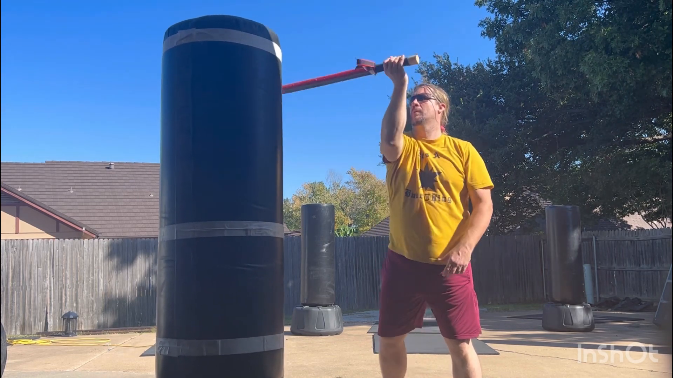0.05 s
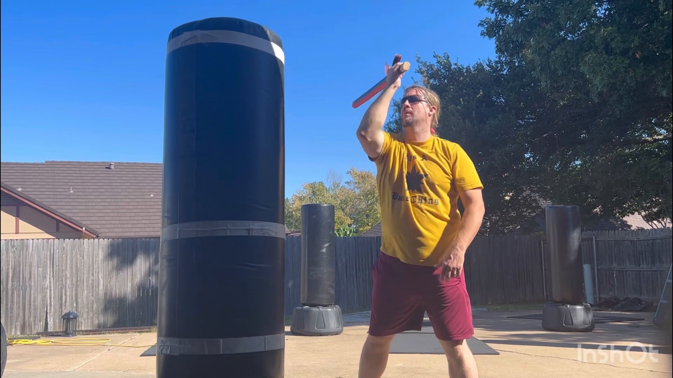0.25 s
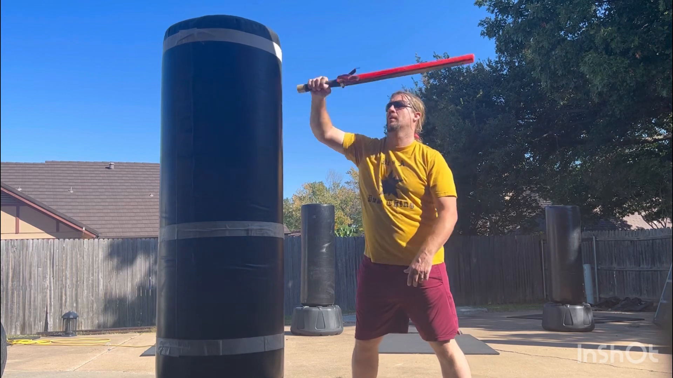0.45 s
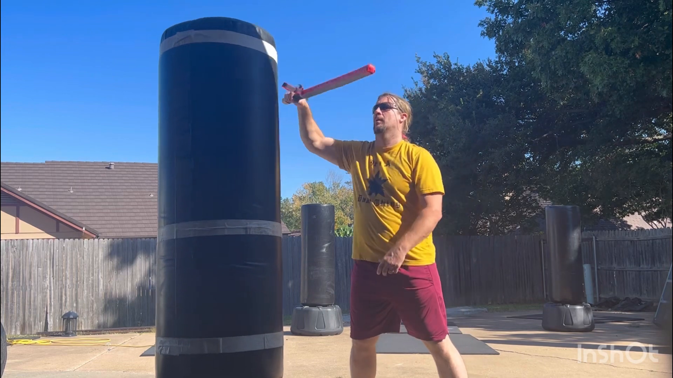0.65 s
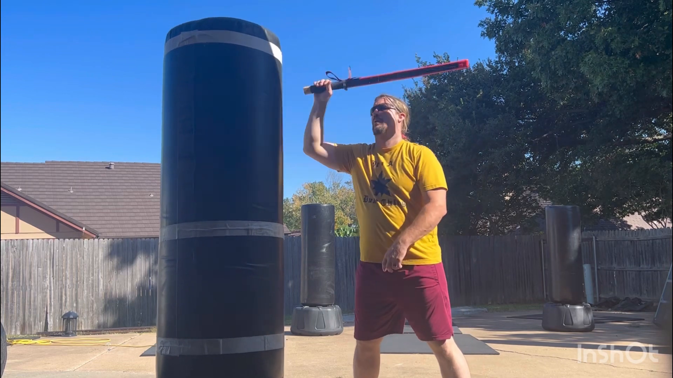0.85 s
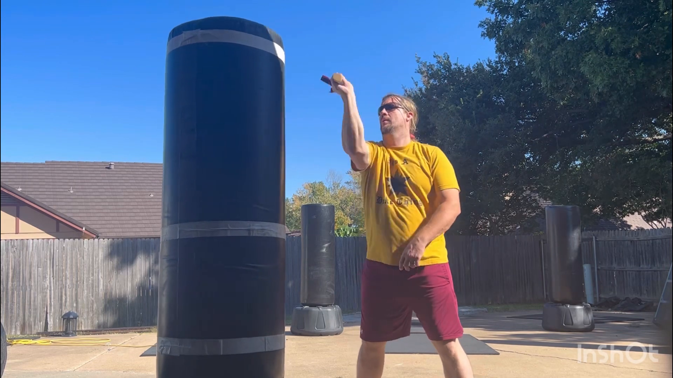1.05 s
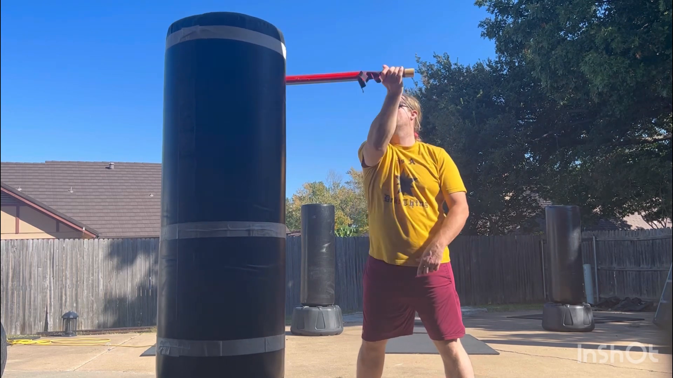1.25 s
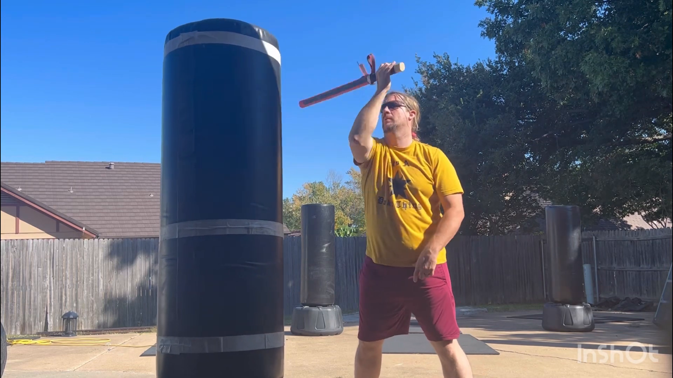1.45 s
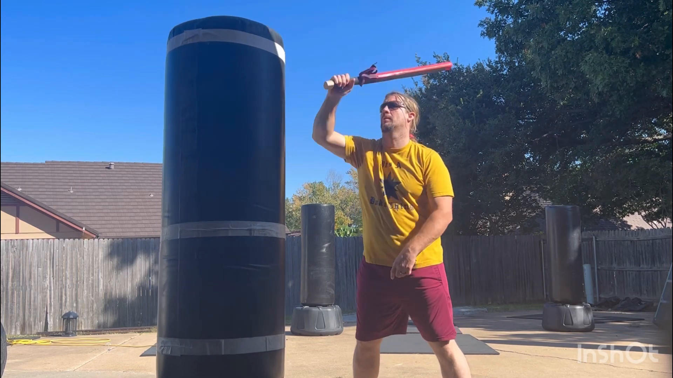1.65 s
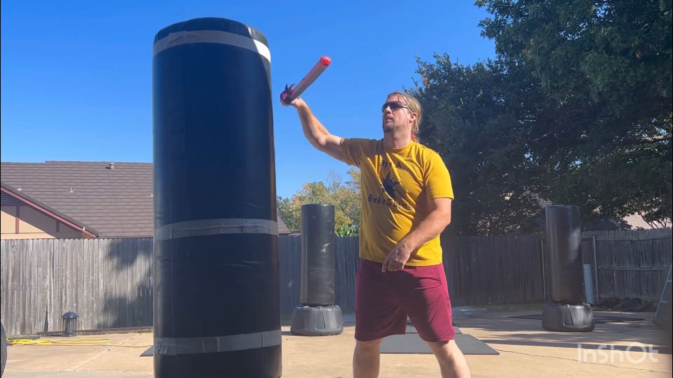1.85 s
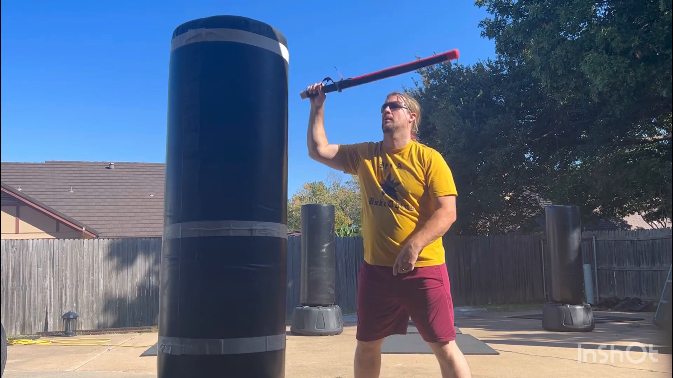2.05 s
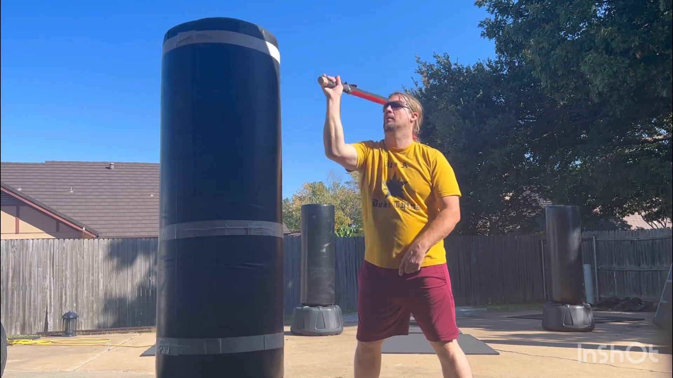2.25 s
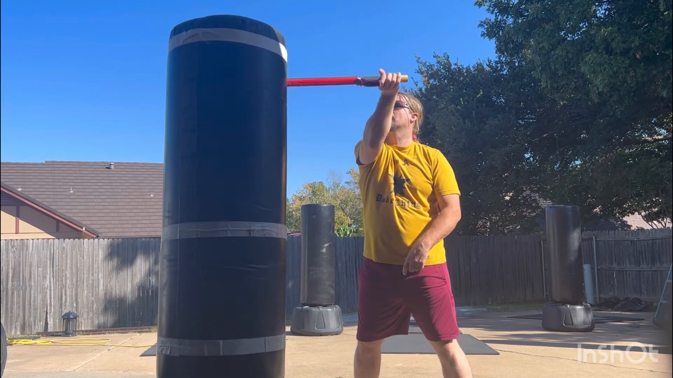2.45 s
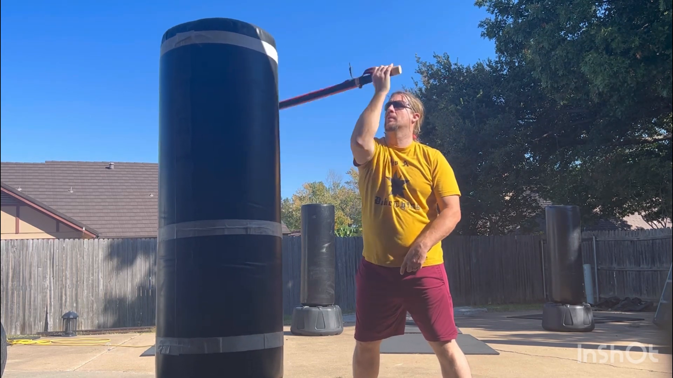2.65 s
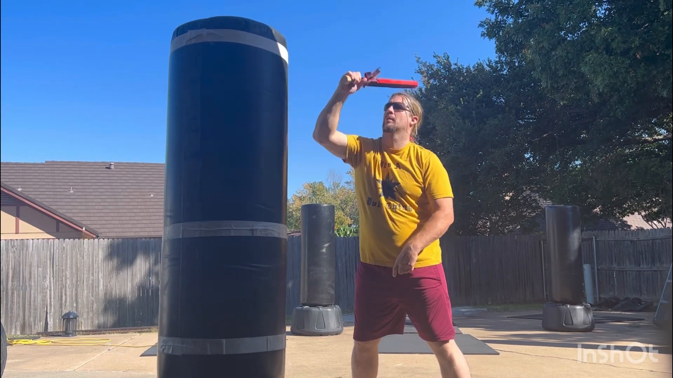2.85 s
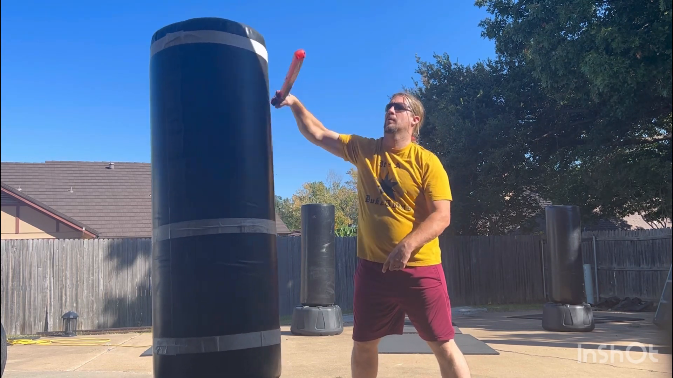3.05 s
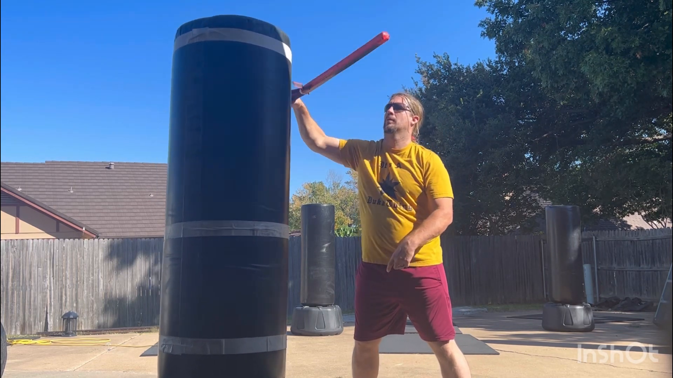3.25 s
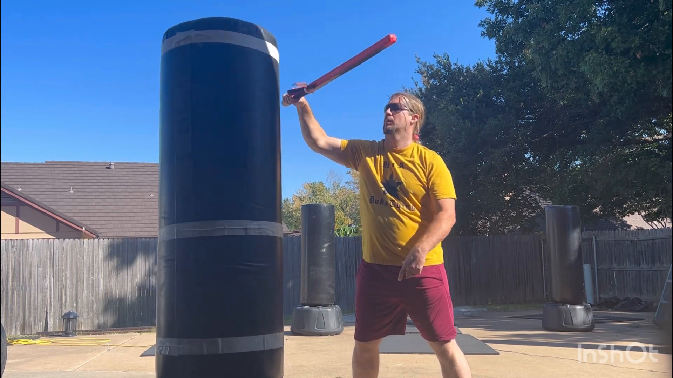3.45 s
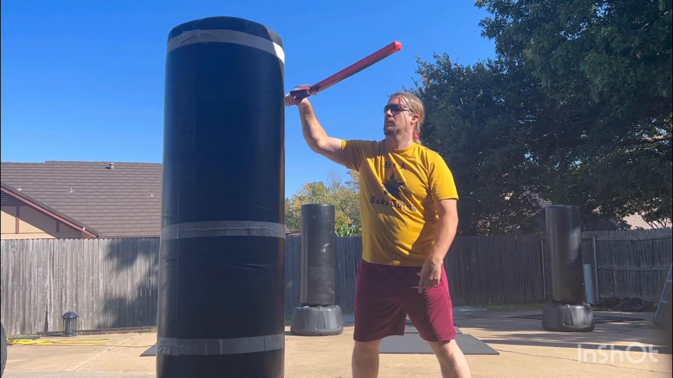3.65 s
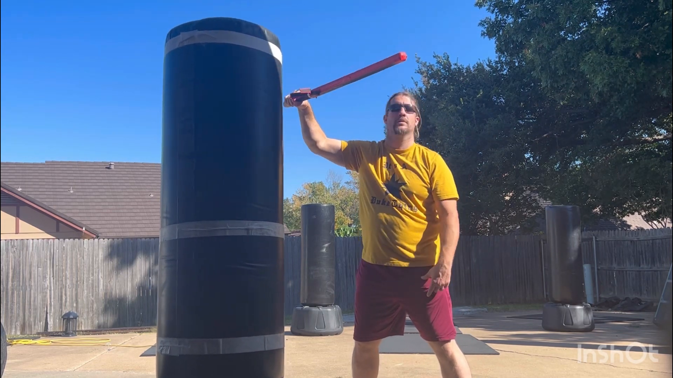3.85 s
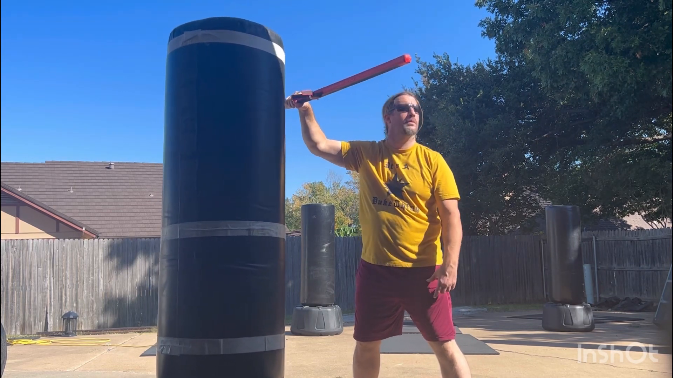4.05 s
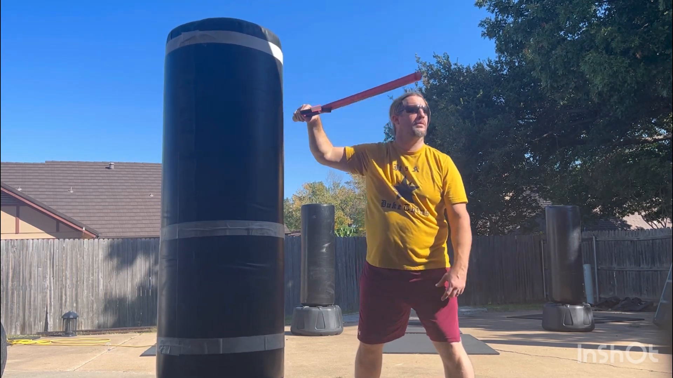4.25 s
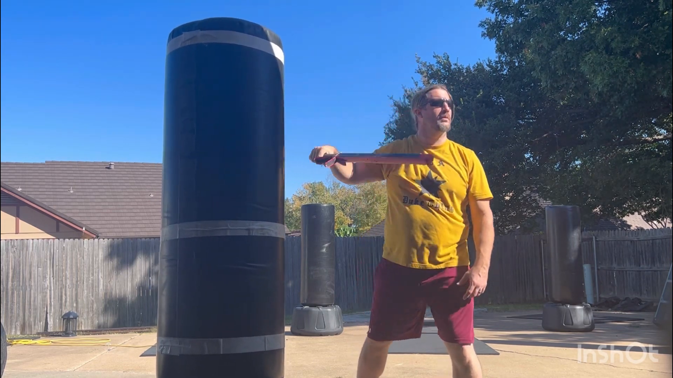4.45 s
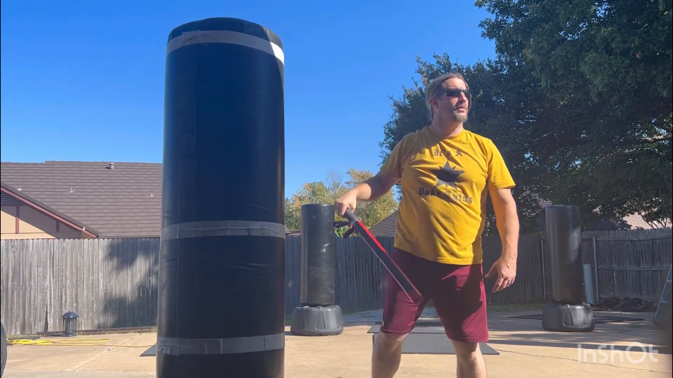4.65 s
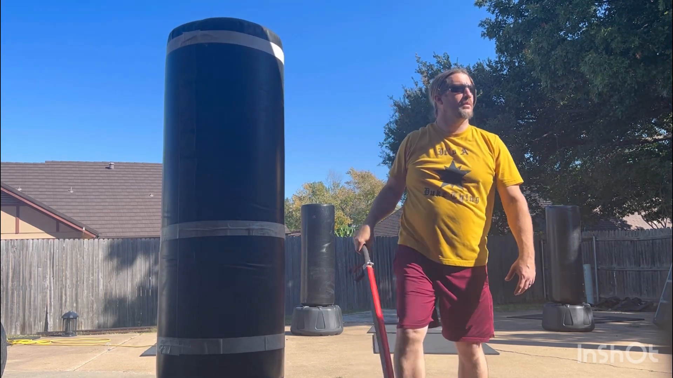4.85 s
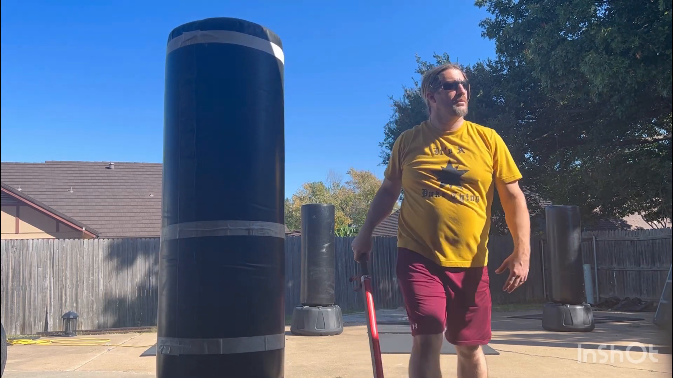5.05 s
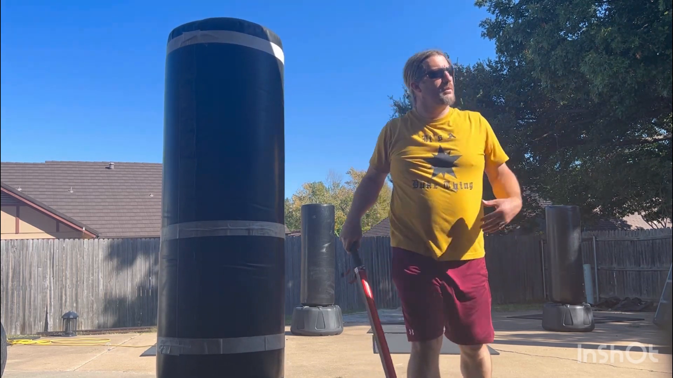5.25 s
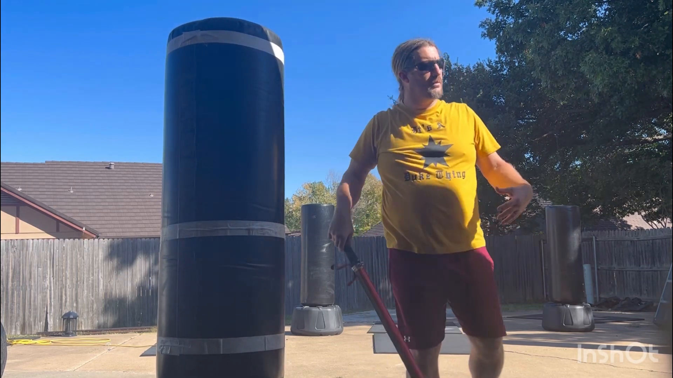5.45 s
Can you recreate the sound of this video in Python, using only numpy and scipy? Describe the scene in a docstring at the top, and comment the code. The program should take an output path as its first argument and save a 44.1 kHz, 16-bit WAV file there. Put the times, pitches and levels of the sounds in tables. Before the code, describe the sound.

The sound begins inside the decay of a blow struck just before the start. A padded practice sword then hits a tall inflated bag at about 0.5, 1.2, 1.8, 2.4 and 3.0 seconds. Each hit is a loud slap whose pitch plunges instantly into a hollow, drum-like boom, with a short dull ring, a quick bounce off paving and a rapidly fading yard tail. The 1.2 blow has more stick knock and crisp grip clicks just after; the 2.4 blow is softer and duller, the 3.0 one very sharp. Between them the bag rocks back with low thuds and grainy plastic creaks, most clearly near 3.3. After 3.8 it is nearly quiet: low distant rumble, barely audible shoe scuffs, a small tick at 5.2, very faint quavering bird whistles and a thin insect buzz. Close stereo, slightly overloaded on peaks.

```python
"""A padded practice sword strikes a tall air-filled punching bag in a fenced yard. Each blow is a slap of
noise, a falling whoop of the taut skin and the summed ring tones of bag and sword; a bounce off the paving and
a fading noise tail from the yard answer it. The bag rocks on its base with thuds, creaks and sharp knocks, the
sword's grip ticks, shoes scuff, a far bird whistles, and a thin insect buzz lies over a low outdoor rumble."""
import sys
import numpy as np
from scipy import signal
from scipy.fft import rfft, irfft
from scipy.io import wavfile
from scipy.ndimage import uniform_filter1d

SR = 44100
rng = np.random.default_rng(int(sys.argv[2]) if len(sys.argv) > 2 else 0)


def materialize(psi):
    """Save the field psi as 16-bit PCM at rate SR to the path in sys.argv[1].

    A 1-D psi becomes a single channel; in a 2-D psi each row is a channel.
    """
    bounded = np.clip(np.atleast_2d(psi).T, -1, 1)
    quanta = np.round(bounded * 32767).astype(np.int16)
    wavfile.write(sys.argv[1], SR, quanta)


N = 242988  # length of the scene in samples


def blows():
    """Each stroke makes slap, whoop and rings together; the paving and the yard throw sound back."""
    # strokes of the sword; a negative time starts before the scene does:
    # [t/s, force/dB, contact time/s, glancing 0-1, air ring level/dB, sword ring level/dB]
    strokes = [ (-.125, 0, 0.00078, 0.9, -14.5, -29), (0.5249, -0.5, .0014, 0.22, -9, -32.5),
               (1.1634, -1, .0024, .68, -10.5, -10.5), (1.7708, -1, 0.0013, 0, -14, -25),
               (2.4277, -1, 0.0039, .95, -19, -22), (2.9939, -1, 0.0006, 0.21, -9.5, -28), ]
    out = np.zeros((2, N))
    for s, force_db, contact, glancing, ring_db, core_db in strokes:
        # each doubling of the contact time beyond 1 ms is one step of softness
        soft = np.log2(contact / 0.001)
        skin_db = force_db - 4.5
        # a glancing stroke stirs mostly the low air modes (dB per octave)
        ring_tilt_db = -11.5 * glancing

        # a soft contact gives a weaker slap and a longer whoop
        slap_sound = slap(force_db - 5.5 - 6 * soft, contact)
        skin = amp(skin_db) * whoop(decay=0.015 * 1.06 ** soft, rise=0.67 * contact)
        direct = slap_sound + skin + amp(core_db) * core(ring_tilt_db)
        add(out, s, echoed(direct, lag=0.00229, gain=amp(-4.5)))  # bounce off the paving
        add(out, s, amp(skin_db) * round_trips() + amp(ring_db) * ring(ring_tilt_db))

        # softer strokes get a duller tail, glancing ones a weaker tail; its level is uneven
        tail = yard(tilt_db=-0.55 - 0.22 * soft) * grit(depth_db=0.5)
        tail_db = force_db - 15 - 4.5 * glancing
        add(out, s, amp(tail_db) * tail * burst(0.00095, 1.8))
    return out


def slap(slap_db, contact, snap_db=0, snap_growth=1.1):
    """Sword on vinyl: noise that swells and fades with the contact, plus the cover's sharp snap."""
    # noise colour of the slap: [f/Hz, relative level/dB]
    slap_colour = [(200, -30.5), (600, -12), (900, 10.5), (1150, -5.5), (1500, -3.5), (2400, 7), (4000, -1),
                   (7000, -9.5), (12000, -8.5), (16000, -4.5)]
    # noise colour of the snap: [f/Hz, relative level/dB]
    snap_colour = [(2000, -17), (4500, -2.5), (8000, 4.5), (12000, -4), (16000, 1)]
    rise = 0.18 * contact
    # a slower contact leans very slightly towards the treble
    tilt_db = 0.14 * np.log2(1 + rise / 0.00051)
    body = amp(slap_db) * noise(slap_colour, tilt_db=tilt_db) * burst(rise, contact)
    # the snap grows faster than the slap, so strong slaps are brighter
    snap = amp(snap_db + snap_growth * slap_db) * noise(snap_colour) * burst(rise / 2, 0.0006)
    return body + snap


def whoop(decay, rise, tension=0.98, start_hz=2530, glide=0.0004476, rest_hz=15):
    """Short waves run fastest over the skin, so the pitch dives from treble to bass in a few cycles."""
    t = np.arange(SR) / SR
    # tension scales the whole pitch curve
    hz = tension * (start_hz / (1 + t / glide) + rest_hz)
    first_push = 1 + 0.5 * np.exp(-t / 0.0094)
    # the sword's foam keeps faster waves out of the skin
    padding = 1 / (1 + (hz / 1152) ** 4)
    wave = np.sin(2 * np.pi * np.cumsum(hz) / SR)
    return wave * burst(rise, decay) * first_push * padding


def round_trips(trip=0.016, first_db=-5, loss_db=-5.0, decay=0.0062):
    """The wave front, its bass and treble softened, returns from the bag's ends, weaker each time."""
    band = signal.butter(1, [130, 600], "bandpass", fs=SR, output="sos")
    front = signal.sosfilt(band, whoop(decay, rise=0.0013))
    out = np.zeros((2, SR))
    for k in range(6):
        add(out, (k + 1) * trip, amp(first_db + k * loss_db) * front)
    return out


def ring(tilt_db):
    """The air modes build up as the wave crosses the bag; the kind of stroke tilts their balance."""
    # air inside the bag, before the tilt; t60 is the time to fall by 60 dB: [f/Hz, level/dB, t60/s]
    air_modes = [(66.2, -10, 0.4), (115.8, -2, 0.27), (173.8, 0, 0.34), (253.2, 5.5, 0.22), (320, -3, .17),
                 (366, -22, 0.18), (423, -25, .17), (526, -12, 0.46), (636, -15.5, .25), (764, -12, 0.13),
                 (855, -16.5, 0.3), (995, -18, 0.076), (1150, -24.5, 0.31), (2270, -17, 0.35)]
    t = np.arange(SR) / SR
    out = np.zeros(SR)
    for hz, db, t60 in air_modes:
        level_db = db + tilt_db * np.log2(hz / 110)
        out += amp(level_db - 60 * t / t60) * np.sin(2 * np.pi * hz * t)
    return out * (1 - np.exp(-(t / 0.025) ** 2))


def core(place_db, lean=-1.66):
    """The sword's short ring; a stroke that stirs the bag's low modes stirs the sword's high ones."""
    # the stiff core damped by its padding, before the lean and a random shift in pitch:
    # [f/Hz, level/dB, t60/s]
    core_modes = [(390, -1, 0.043), (660, 0.5, .04), (908, -4, 0.079), (1320, -11.5, 0.036),
                  (1580, -8.5, 0.021), (1980, -20, 0.029), (2310, -32.5, 0.064)]
    t = np.arange(SR) / SR
    out = np.zeros(SR)
    for hz, db, t60 in core_modes:
        level_db = db + lean * place_db * np.log2(max(hz / 900, 1))
        shifted_hz = hz * rng.uniform(0.89, 1.02)
        out += amp(level_db - 60 * t / t60) * np.sin(2 * np.pi * shifted_hz * t)
    return out * (1 - np.exp(-t / 0.0016))


def echoed(x, lag, gain):
    """A sound plus one copy of it, delayed by lag seconds."""
    out = x * np.ones((2, 1))
    add(out, lag, gain * x)
    return out


def yard(tilt_db=0, far_db=-21, linger=3.07):
    """A noise tail that fades sooner in the treble; far roofs and trees add a faint, slower one."""
    # scatter from fence, paving and trees: [f/Hz, relative level/dB]
    scatter_colour = [(25, -13), (60, 0), (130, -3), (280, 2.5), (480, -4.5), (800, -7), (1300, -11),
                      (2400, -15.5), (4000, -20), (8000, -21), (11500, -23.5), (15500, -25.5)]
    # how long the scatter takes to fall by 60 dB: [f/Hz, t60/s]
    scatter_t60 = [(60, 1.52), (250, 0.73), (700, 0.65), (2400, 0.64), (5000, 0.6), (8000, .45),
                   (12000, 0.31), (16000, .3)]
    hz, t, z = signal.stft(noise(scatter_colour, tilt_db=tilt_db), SR, nperseg=512)
    fall_db = -60 * t / read(scatter_t60, hz)[:, None]
    far = amp(far_db + fall_db / linger) / (1 + (hz[:, None] / 5000) ** 2)
    both = np.hypot(amp(fall_db), far)
    return signal.istft(z * both, SR, nperseg=512)[1][:, :SR]


def rocking():
    """The bag swings back: a soft thud in the base and a grainy rub of plastic."""
    # the bag rocks back on its base: [t/s, thud level/dB, creak level/dB]
    rocks = [(0.864, -28.5, -46.5), (1.52, -34.5, -54), (2.121, -31, -39.5), (2.784, -40.5, -52.5),
             (3.305, -24.5, -43), (3.489, -37.5, -49), (3.684, -53, -51.5), (3.728, -36.5, -54),
             (4.27, -42.5, -71)]
    # noise colour of the thud: [f/Hz, relative level/dB]
    thud_colour = [(30, -28), (65, -3), (125, 2), (250, -10.5), (450, -22), (1200, -68.5)]
    # noise colour of the creak: [f/Hz, relative level/dB]
    creak_colour = [(150, -16.5), (450, 4.5), (900, 2.5), (1400, 5.5), (2500, -11.5), (5000, -34),
                    (9000, -39), (15000, -58)]
    out = np.zeros((2, N))
    for s, thud_db, creak_db in rocks:
        thud = noise(thud_colour) * burst(0.0033, 0.053)
        creak = noise(creak_colour) * burst(0.00077, 0.029) * grit(depth_db=-1.5)
        add(out, s, amp(thud_db) * thud)
        add(out, s, amp(creak_db) * creak)
    return out


def sharp_ticks(wet_db=-24):
    """Sharp ticks: very short noise bursts, each with a faint tail; most come from the sword's grip, those at
    3.494 s and 3.71 s from the bag knocking as it rocks on its base."""
    # ticks; the tilt acts above 300 Hz: [t/s, level/dB, tilt/dB per octave]
    ticks = [(.424, -65, 6), (1.0888, -55, 2), (1.1687, -16.5, 0), (1.1745, -22, 1), (1.2252, -24, 1.5),
             (1.2286, -11, -1.5), (2.487, -34.5, 3), (3.494, -43, -3), (3.71, -38.5, -3.5),
             (4.157, -55.5, 2), (5.1079, -52, 0.5), (5.225, -37.5, -1.5)]
    # noise colour of a tick: [f/Hz, relative level/dB]
    tick_colour = [(400, -15.5), (1300, 5), (3000, 1.5), (6000, -4.5), (10000, -4), (16000, -16)]
    out = np.zeros((2, N))
    for s, db, tilt_db in ticks:
        shape = burst(0.0001, 0.0011) + amp(wet_db) * burst(0.004, 0.035)
        add(out, s, amp(db) * noise(tick_colour, tilt_db=tilt_db) * shape)
    return out


def shoe_scuffs():
    """Shoes rub over the paving: gritty noise that swells and fades."""
    # scuffs: [t/s, level/dB, length/s]
    scuffs = [(3.965, -62.5, 0.36), (4.484, -66, 0.11), (4.997, -63.5, 0.092), (5.073, -70.5, 0.45)]
    # noise colour of a scuff: [f/Hz, relative level/dB]
    scuff_colour = [(300, -3.5), (1500, 1), (4000, -5.5), (8000, -9), (11000, -17), (16000, -24)]
    out = np.zeros((2, N))
    for s, db, length in scuffs:
        size = int(length * SR)
        rub = (noise(scuff_colour) * grit(depth_db=4.5))[:, :size]
        add(out, s, amp(db) * rub * np.hanning(size))
    return out


def bird(level_db=-2):
    """Each far call is a clear high note, overlapped by a more slurred one about a third lower."""
    # calls, levels before level_db: [t/s, pitch of first note f/Hz, first level/dB, second level/dB]
    calls = [(0.406, 3200, -66, -74), (1.541, 3130, -68, -68), (2.2, 3300, -61.5, -61.5),
             (2.839, 3410, -64, -60), (3.85, 3170, -63, -68), (4.11, 2830, -62, -70),
             (4.217, 3330, -67, -69.5), (4.459, 3120, -60, -76), (4.672, 3090, -59.5, -69),
             (4.975, 3480, -58.5, -67)]
    out = np.zeros((2, N))
    for s, hz, first_db, second_db in calls:
        add(out, s, amp(first_db) * whistle(hz, quaver=0.022))
        add(out, s + 0.05, amp(second_db) * whistle(hz * 0.8, quaver=0.059))
    return amp(level_db) * out


def whistle(start_hz, quaver, blur=0.057):
    """One sinking, quavering note, blurred by the trees: mixed with a smear through fading noise."""
    size = int(0.091 * SR)  # note length in s
    waver = evened(uniform_filter1d(rng.standard_normal(SR), size=110))[:size]
    sag = np.linspace(1, 1 - 0.027, size)  # sinks by this share of its pitch
    hz = start_hz * sag * (1 + quaver * waver)
    note = np.sin(2 * np.pi * np.cumsum(hz) / SR) * signal.windows.tukey(size, 0.5)
    smear = rng.standard_normal((2, SR)) * burst(0.00084, blur)
    far = signal.fftconvolve(note[None], smear, axes=1)
    far *= np.linalg.norm(note) / np.linalg.norm(far[0])
    add(far, 0, 0.49 * note)
    return far


def insects():
    """A thin far buzz: a steady narrow band of noise."""
    # noise colour of the buzz: [f/Hz, relative level/dB]
    buzz_colour = [(4500, -34), (4900, -4.5), (5000, -4), (5100, -4), (5500, -35.5)]
    return amp(-82) * noise(buzz_colour, size=N)


def rumble():
    """Distant traffic and air: low noise whose level wavers very slightly."""
    # noise colour of the rumble: [f/Hz, relative level/dB]
    rumble_colour = [(25, -39), (38, -7.5), (55, -5), (120, -2.5), (160, -11.5), (200, -8), (280, -16.5),
                     (400, -22), (1000, -31.5), (1700, -44), (3000, -44.5), (5200, -51), (8000, -56.5),
                     (11000, -65), (16000, -71)]
    t = np.arange(N) / SR
    waver = np.zeros(N)
    for hz in np.geomspace(0.5, 8, 20):
        waver += np.sin(2 * np.pi * (hz * t + rng.random()))
    level_db = -44.5 + 0.15 * evened(waver)
    return noise(rumble_colour, size=N) * amp(level_db)


def noise(spectrum, size=SR, tilt_db=0):
    """Coloured stereo noise of rms 1 before the tilt, most alike in both ears in the bass."""
    # how alike left and right are (1 = identical): [f/Hz, likeness 0-1]
    likeness = [(80, 0.99), (250, 0.81), (500, 0.09), (1000, 0), (3000, 0.47), (8000, 0.32), (15000, 0)]
    hz = np.fft.rfftfreq(size, 1 / SR)
    a, b = rfft(rng.standard_normal((2, size)))
    same = np.clip(read(likeness, hz), -1, 1)
    mid, side = a * np.sqrt(1 + same), b * np.sqrt(1 - same)
    colour = evened(amp(read(spectrum, hz)))
    colour = colour * amp(tilt_db * np.log2(np.maximum(hz / 300, 1)))  # dB per octave above 300 Hz
    return irfft(np.array([mid + side, mid - side]) * colour / np.sqrt(2), size)


def burst(rise, decay):
    """One second of envelope: a quick swell, then an exponential fall (time constants in s)."""
    t = np.arange(SR) / SR
    return (1 - np.exp(-t / rise)) * np.exp(-t / decay)


def grit(depth_db, size=SR):
    """An uneven level of rms 1 that changes every few milliseconds."""
    wander = evened(uniform_filter1d(rng.standard_normal(size), size=130))
    return evened(amp(depth_db * wander))


def amp(db):
    """Decibels to gain."""
    return 10 ** (np.asarray(db) / 20)


def evened(x):
    """Scales to rms 1."""
    return x / np.sqrt(np.mean(x ** 2) + 1e-20)


def read(points, hz):
    """Reads a table on a log-frequency axis."""
    f, value = np.transpose(points)
    return np.interp(np.log(hz + 1), np.log(f + 1), value)


def add(mix, s, sound):
    """Mixes a sound in from time s on, cutting off what falls outside the mix."""
    start = round(s * SR)
    sound = sound[..., max(-start, 0):]
    part = mix[:, max(start, 0):][:, :sound.shape[-1]]
    part += sound[..., :part.shape[-1]]


def scene():
    """Everything that reaches the microphones."""
    return blows() + rocking() + sharp_ticks() + shoe_scuffs() + bird() + insects() + rumble()


def record(dry, low_cut_hz=36, edge_hz=16400, ceiling=1.0):
    """Microphone colour and low cut, a soft overload of the loudest peaks, then the band limit."""
    # dips in the microphones' treble: [f/Hz, width/Hz, depth/dB]
    notches = [(9664, 560, -25), (13300, 590, -19.5)]
    # stereo balance of the microphones: [f/Hz, left minus right level/dB]
    balance = [(60, -0.6), (250, -2), (700, 0), (2000, 0), (4500, 5.5), (8000, -0.5)]
    size = 2 ** 18
    hz = abs(np.fft.fftfreq(size, 1 / SR))
    colour_db = sum(db * np.exp(-((hz - f) / width) ** 2) for f, width, db in notches)
    # give the dips the phase of a filter that only acts after the sound arrives
    causal = np.exp(np.conj(signal.hilbert(np.log(amp(colour_db)))))
    sides = amp(np.outer([0.5, -0.5], read(balance, hz)))
    x = np.fft.ifft(np.fft.fft(dry, size) * causal * sides).real[:, :N]
    x = signal.sosfilt(signal.butter(2, low_cut_hz, "highpass", fs=SR, output="sos"), x)
    x = x / (1 + (x / ceiling) ** 6) ** (1 / 6)
    band_limit = signal.firwin(255, edge_hz, window=("kaiser", 9), fs=SR)
    return signal.oaconvolve(x, band_limit[None], "same")


dry = scene()
out = record(dry)
materialize(out)
```